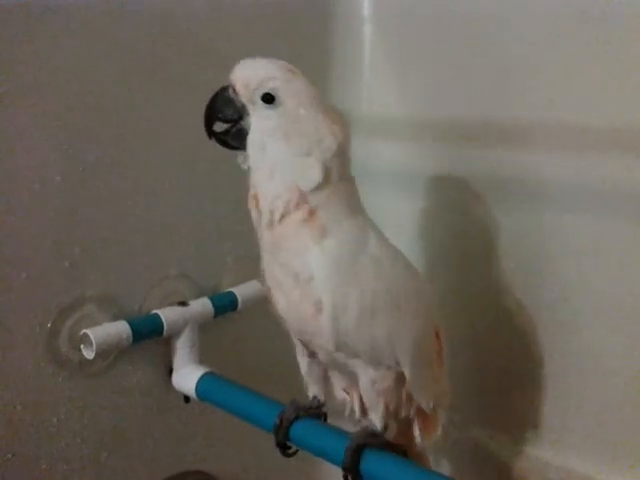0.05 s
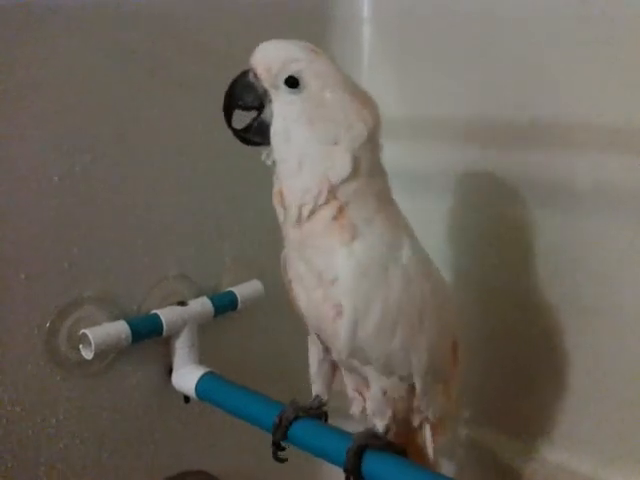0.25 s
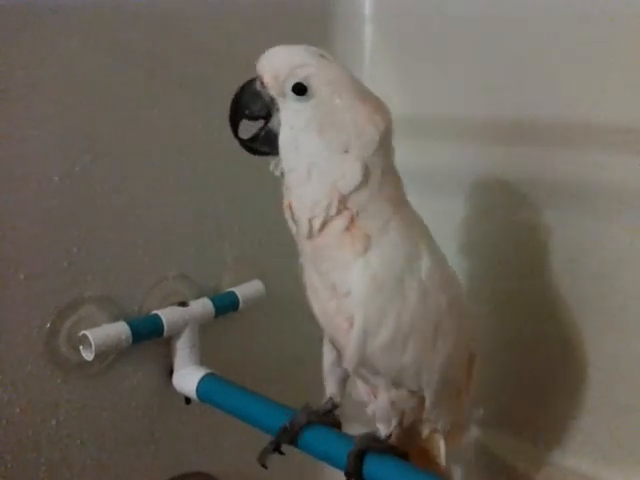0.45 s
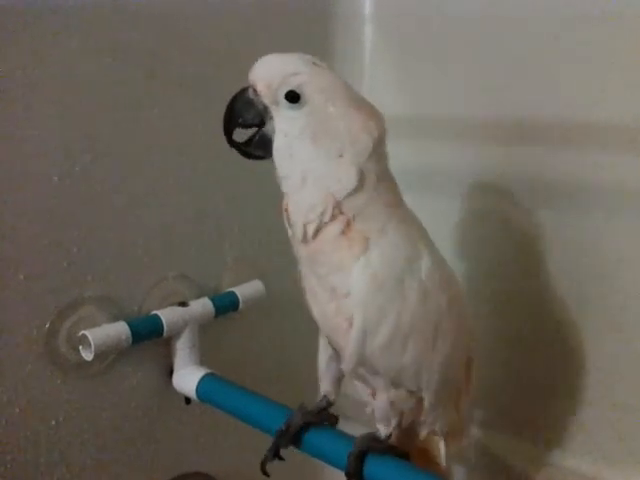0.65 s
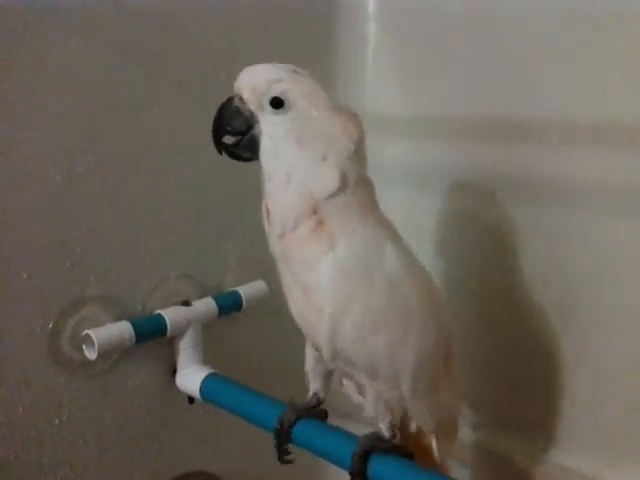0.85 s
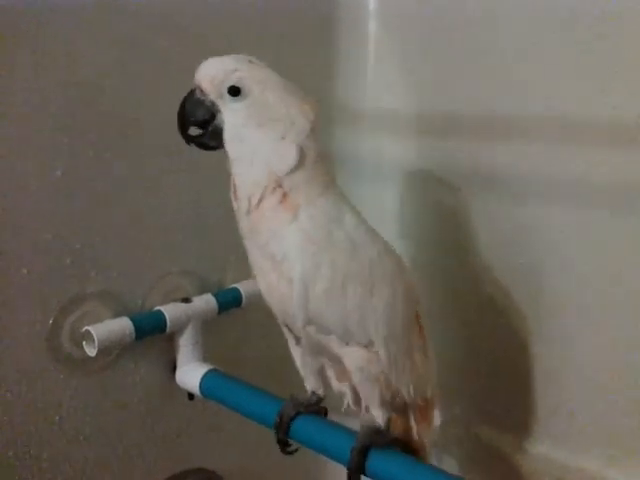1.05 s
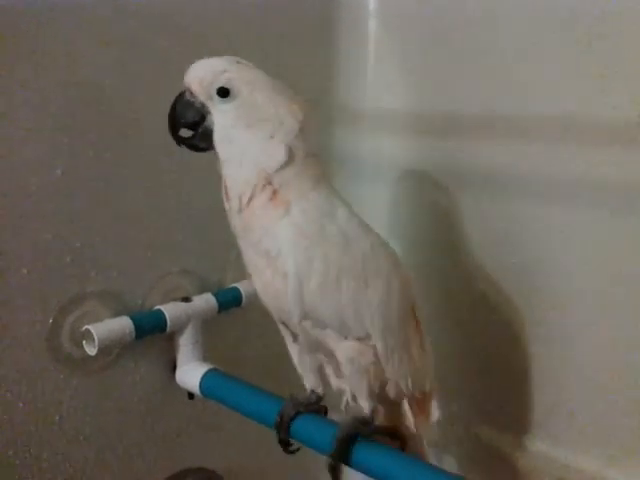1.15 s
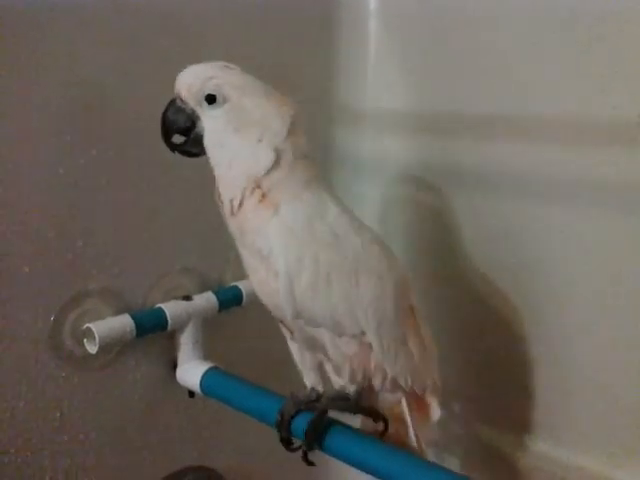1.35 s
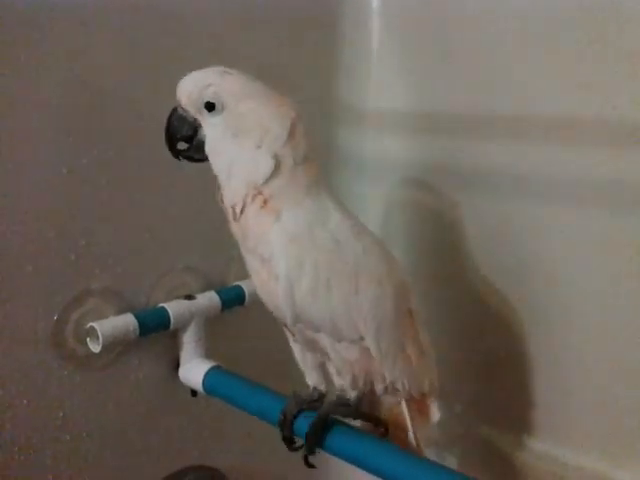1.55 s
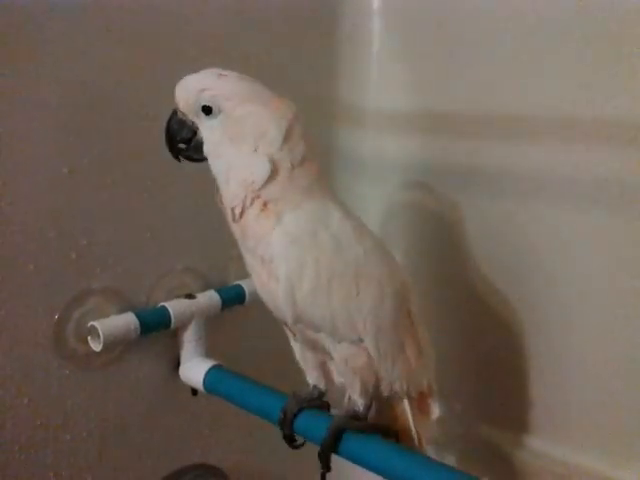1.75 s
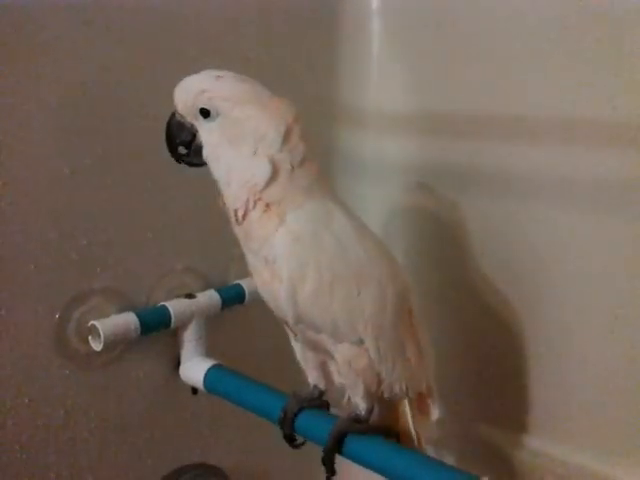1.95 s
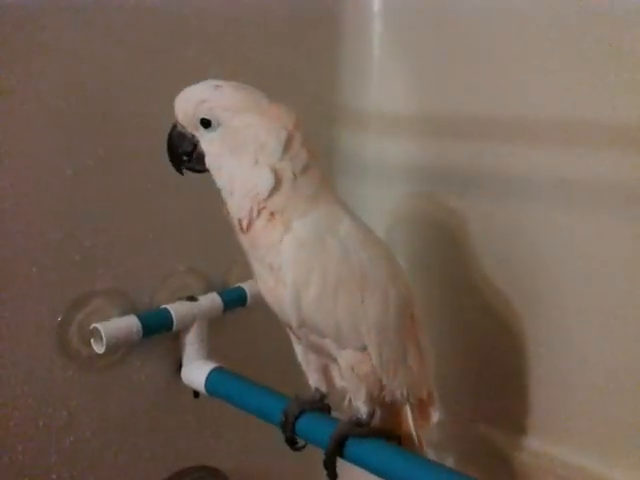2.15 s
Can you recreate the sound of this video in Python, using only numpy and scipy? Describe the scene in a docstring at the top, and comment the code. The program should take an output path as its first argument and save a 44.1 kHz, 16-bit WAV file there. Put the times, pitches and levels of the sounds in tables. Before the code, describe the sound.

A cockatoo squawks once, starting on a clear falling note that turns into a harsh, fluttering rasp and ends in a hissy croak. After a pause it clacks its beak rapidly. Small bathroom walls add a short echo.

```python
"""A cockatoo squawks once in a small, hard-walled bathroom, then clacks its beak in a quickening run.
Its voice box (the syrinx) first vibrates evenly, making a clear falling note. It then slaps unevenly,
so the throat rings with a harsh, fluttering rasp, and ends in a short, hissy croak. Each clack
makes the hollow beak ring. The walls echo voice and beak; under them are a faint rustle of
feathers, two dull bumps and a steady hush."""
import sys
import numpy as np
from scipy import signal
from scipy.fft import rfft, irfft
from scipy.io import wavfile
from scipy.ndimage import uniform_filter1d

SR = 44100
rng = np.random.default_rng(int(sys.argv[2]) if len(sys.argv) > 2 else 0)


def store_wav(level_fs):
    """Save 16-bit WAV to argv[1]."""
    pcm = np.round(np.clip(np.atleast_2d(level_fs), -1, 1) * 32767)
    wavfile.write(sys.argv[1], SR, pcm.T.astype(np.int16))


N = 97020
T = np.arange(N) / SR


def amp(db):
    """Turns decibels into a gain to multiply by."""
    return 10 ** (np.asarray(db) / 20)


def unit(x):
    """Scales a signal to an average (rms) strength of 1."""
    return x / np.sqrt(np.mean(x ** 2) + 1e-20)


def fade(t, ring_s, level_db=0):
    """Starts at level_db and falls 60 dB every ring_s seconds."""
    return amp(level_db - 60 * t / ring_s)


def value_at(points, hz):
    """Looks up a frequency between the rows of a table, on a log scale."""
    freq_hz, values = np.transpose(points)
    return np.interp(np.log(hz + 1), np.log(freq_hz), values)


def levels(rows):
    """One gain curve for each dB column, silent before the first row and after the last."""
    times, *columns = np.transpose(rows)
    return [amp(np.interp(T, times, db)) * (T >= times[0]) * (T <= times[-1]) for db in columns]


def pitch_and_levels(rows):
    """Turns rows of time, pitch and any dB columns into a pitch curve and gain curves."""
    times, pitch_hz = np.transpose(rows)[:2]
    return np.interp(T, times, pitch_hz), levels(np.delete(rows, 1, axis=1))


def add(mix, start_s, sound):
    """Mixes a sound in at its start time."""
    part = mix[max(round(start_s * SR), 0):][:len(sound)]
    part += sound[:len(part)]


def colour(x, points, size=4096):
    """Makes some frequencies louder and others softer; white noise keeps its overall strength."""
    log_gain = np.log(amp(value_at(points, abs(np.fft.fftfreq(size, 1 / SR)))))
    response = np.exp(np.conj(signal.hilbert(log_gain)))  # rings after a sound, never before
    taps = np.fft.ifft(response).real[:size // 2]
    return signal.fftconvolve(x, taps / np.linalg.norm(taps))[:len(x)]


def wobbly_phase(hz, jitter, rate_hz):
    """The running angle of a vibration whose pitch wanders at random by the fraction jitter."""
    keep_slow = np.exp(-(np.fft.rfftfreq(N, 1 / SR) / rate_hz) ** 2)
    wander = unit(irfft(rfft(rng.standard_normal(N)) * keep_slow, N))
    return 2 * np.pi * np.cumsum(hz * (1 + jitter * wander)) / SR


# The tone of the hush: freq_hz, gain_db
AIR_COLOUR = [(20, -34.5), (146, -10.5), (319, -6), (472, -10.5), (600, -10), (828, -13.5), (5730, -21.5),
              (8680, -27.5), (19100, -120)]

def room_air(level_db=-61.5):
    """A faint, steady hush fills the room."""
    return amp(level_db) * unit(colour(rng.standard_normal(N), AIR_COLOUR))


# How long the room rings, from low to high: freq_hz, ring_s
ROOM_RING = [(150, 0.67), (400, 0.4), (850, 0.28), (5000, 0.24), (8000, 0.14)]
# Bounces off the nearest walls: delay_s, gain
WALL_ECHOES = [(.0034, 0.12), (.0052, -0.16), (0.0163, .15)]

def bathroom(x, size=32768, standing_wave_hz=440.7):
    """Hard walls return a few quick echoes, a dense tail and one standing wave that rings on."""
    average_fade = fade(np.arange(size) / SR, np.mean(np.transpose(ROOM_RING)[1]))
    noise = rng.standard_normal(size)
    for _ in range(6):  # even out the noise across pitch, then across time
        even = irfft(np.exp(1j * np.angle(rfft(noise * average_fade))), size)
        noise = even / np.sqrt(abs(uniform_filter1d(even ** 2, size=300)) + 1e-20)
    hz, frame_s, bands = signal.stft(noise, SR, nperseg=256)
    bands = bands * fade(frame_s, value_at(ROOM_RING, hz)[:, None])
    tail = signal.istft(bands, SR, nperseg=256)[1]
    t = np.arange(len(tail)) / SR
    tail *= np.clip(t / .0042 - .5, 0, 1)  # the tail arrives a moment late
    tail /= np.linalg.norm(tail)
    tail += .0025 * fade(t, ring_s=1) * np.sin(2 * np.pi * standing_wave_hz * t)
    for delay_s, gain in WALL_ECHOES:
        add(tail, delay_s, np.array([gain]))
    return signal.fftconvolve(x, tail)[:N]


# Faint, dull thuds: start_s, pitch_hz, level_db
SOFT_BUMPS = [(0.126, 235.7, -62), (.95, 135.5, -63.5)]

def bumps(rise_s=.007, ring_s=.6):
    """Soft low thuds, perhaps the perch as the bird shifts its feet."""
    out, t = np.zeros(N), T[:SR // 2]
    rise = np.minimum(t / rise_s, 1)
    for start_s, hz, db in SOFT_BUMPS:
        add(out, start_s, rise * fade(t, ring_s, db) * np.sin(2 * np.pi * hz * t))
    return out


# The thin tone of rustling feathers, also used for the beak's scrape: freq_hz, gain_db
SCRAPE_COLOUR = [(1000, -19.5), (2800, -3), (4200, -9.5), (5800, -0.5), (9000, -17.5)]

def feathers(peak_s=1.35, width_s=.035, level_db=-61.5):
    """The feathers stir in one soft, brief rustle."""
    swell = np.exp(-((T - peak_s) / width_s) ** 2)
    return amp(level_db) * swell * colour(rng.standard_normal(N), SCRAPE_COLOUR)


# How loud the beak grinds around the hardest clacks: time_s, level_db
GRIND_LEVELS = [(1.885, -44.5), (1.895, -49.5), (1.955, -42.5), (2.0, -57.5)]
# The tone of the grinding: freq_hz, gain_db
SLIP_COLOUR = [(120, -33.5), (280, -1.5), (2500, 2.5), (3300, -16), (7200, -7.5), (9000, -29)]

def beak_grinding(slips_per_s=1100, spread_db=5.5):
    """The two halves of the beak rub together in many tiny slips."""
    slips = (rng.random(N) < slips_per_s / SR) * rng.choice([-1., 1.], N)
    slips *= amp(spread_db * rng.standard_normal(N))
    return levels(GRIND_LEVELS)[0] * unit(colour(slips, SLIP_COLOUR))


# Clacks, mostly in pairs as the tip hits and bounces: start_s, level_db, treble_db, knock_db
BEAK_CLACKS = [(0.012, -44, 16.5, 0.5), (1.6674, -34.5, 4, 1.5), (1.721, -35.5, 4.5, 2.5),
               (1.768, -27.5, 0.5, -3), (1.7811, -35, -8, -0.5), (1.807, -24.5, -1, -4.5),
               (1.822, -35, -1, 1), (1.8551, -23, 1.5, -3.5), (1.8675, -32, -1, 2),
               (1.8891, -18.5, 1.5, -4), (1.902, -18, -3.5, -4), (1.933, -16.5, -2, -6),
               (1.9457, -20.5, -1.5, -2.5), (2.019, -25, 6.5, 5), (2.032, -34, -11, 8),
               (2.069, -31.5, -5, -3), (2.16, -30.5, 4.5, -0.5), (2.1737, -31.5, 1, -8)]
# The notes of the hollow beak, its hard tip and the low knock: pitch_hz, level_db, ring_s
HOLLOW_NOTES = [(754, -12, 0.016), (1208, 3, 0.0064), (1462, -1.5, 0.0071), (2190, -14, 0.018),
                (2690, -10, 0.0073)]
TIP_NOTES = [(4500, 1, 0.0056), (7140, -19, .005)]
KNOCK_NOTES = [(285, -18, 0.03), (351.4, -29, 0.21), (422.3, -19, 0.096), (593, -9, 0.023)]
# The tone of the tip's snap: freq_hz, gain_db
TIP_SNAP_COLOUR = [(300, -3.5), (1500, 1), (3300, -8), (4200, -1.5), (6000, -12), (9000, -26.5)]

def beak_clacks(size=5000, contact_s=.0013, knock_rise_s=.003):
    """In each clack the tip snaps, the hollow beak rings and a low knock swells just after."""
    out, t = np.zeros(N), np.arange(size) / SR
    contact = np.minimum(t / contact_s, 1)
    knock_rise = np.minimum(t / knock_rise_s, 1)

    def ring(notes, random_phase=False):
        """Struck notes die away, tuned a little differently each time."""
        sound = np.zeros(size)
        for hz, db, ring_s in notes:
            pitch_hz = hz * (1 + .015 * rng.standard_normal())
            turns = pitch_hz * t + random_phase * rng.random()
            sound += fade(t, ring_s, db) * np.sin(2 * np.pi * turns)
        return sound

    def burst(points, level_db, ring_s):
        """A click made of quickly fading noise."""
        return colour(rng.choice([-1., 1.], size) * fade(t, ring_s, level_db), points)

    for start_s, db, treble_db, knock_db in BEAK_CLACKS:
        shell = ring(HOLLOW_NOTES) + amp(treble_db) * ring(TIP_NOTES)
        knock = amp(knock_db) * knock_rise * ring(KNOCK_NOTES, random_phase=True)
        snap_db = -7 + treble_db + .37 * (db + 26)  # harder clacks have a bigger share of snap
        snap = burst(TIP_SNAP_COLOUR, snap_db, ring_s=.012)
        add(out, start_s, amp(db) * (contact * (shell + snap) + knock))
    edge_scrape = burst(SCRAPE_COLOUR, level_db=-44.5, ring_s=.017)
    add(out, start_s=.1075, sound=edge_scrape)
    return signal.sosfilt(signal.butter(5, 210, "high", fs=SR, output="sos"), out)


def voice_pulses(hz, jitter, breath):
    """The voice box slaps unevenly, with a puff of air each time; breath (0 to 1) favours the puffs."""
    turns = wobbly_phase(hz, jitter, rate_hz=300) / (2 * np.pi)
    slaps = np.diff(np.floor(turns), prepend=0)
    puffs = (.4 + np.exp(-(turns % 1) / 1.3)) * rng.standard_normal(N)
    return unit((1 - breath) * unit(slaps - slaps.mean()) + breath * unit(puffs))


# The croak's note and its first two harmonics: time_s, pitch_hz, first_db, second_db
CROAK_NOTE = [(.744, 400, -64, -58), (.752, 407, -46, -34), (.772, 428, -51, -30.5),
              (.798, 422, -49, -33.5), (.815, 405, -43, -48), (.835, 400, -45, -54), (.848, 297, -49, -62),
              (.893, 296, -52, -72), (.91, 432, -53, -68), (.945, 432, -54, -74), (.99, 432, -70, -91)]
# How hoarse the croak is: time_s, throat_db, hiss_db
HOARSE_LEVELS = [(.741, -71, -67), (.7455, -31.5, -54), (.758, -34, -54), (.762, -32, -41),
                 (.79, -34, -42.5), (.812, -41, -44), (.85, -41, -45), (.875, -45.5, -53),
                 (.92, -52.5, -61)]
# The tone of the hoarse throat and of the hiss: freq_hz, gain_db
CROAK_THROAT = [(200, -31.5), (350, -11), (700, 5), (1000, 3.5), (1250, 0.5), (1600, 9), (1950, 6),
                (2300, -4), (3500, -47.5)]
CROAK_HISS = [(1500, -38.5), (2500, 0.5), (3000, 7), (3600, -2), (4200, 0.5), (5000, -7), (5450, -26),
              (6400, -11.5), (7100, -57.5)]

def croak():
    """A lower note, hoarse at first, dips under a hiss and ends in a soft hoot."""
    pitch_hz, gains = pitch_and_levels(CROAK_NOTE)
    phase = wobbly_phase(pitch_hz, jitter=.012, rate_hz=91)
    tone = np.sqrt(2) * sum(gain * np.sin(k * phase) for k, gain in enumerate(gains, 1))
    pulses = voice_pulses(pitch_hz, jitter=.11, breath=.64)
    throat_gain, hiss_gain = levels(HOARSE_LEVELS)
    return tone + throat_gain * colour(pulses, CROAK_THROAT) + hiss_gain * colour(pulses, CROAK_HISS)


def steady_pressure(x, smooth_s=.005):
    """Steady air pressure holds a rough vibration at an even strength."""
    window = signal.windows.hann(2 * round(smooth_s * SR))
    power = signal.fftconvolve(x ** 2, window / window.sum(), "same")
    return x / np.sqrt(abs(power) + 1e-12)


# How loud the throat's low and high rings are: time_s, low_db, high_db
RASP_LEVELS = [(.39, -72, -75.5), (.405, -31, -34), (.44, -38.5, -36), (.5, -30, -31), (.535, -42, -27.5),
               (.555, -30, -29.5), (.62, -25.5, -22.5), (.662, -34.5, -25), (.682, -37.5, -31),
               (.697, -57, -30.5), (.735, -62, -55)]
# The tone of each ring: freq_hz, gain_db
LOW_RING = [(60, -69), (250, -63.5), (500, -21.5), (640, -4.5), (800, 1.5), (930, -0.5), (1080, -17.5),
            (1400, -28.5), (2400, -71.5)]
HIGH_RING = [(60, -67), (330, -11), (560, -10.5), (800, -22.5), (1200, -6.5), (1640, 3.5), (1820, -4),
             (2250, -31.5), (3050, -37), (3900, -48), (4750, -35.5), (5400, -45.5), (6250, -30.5),
             (7200, -71.5)]
# A strained tone that wavers inside the rasp: time_s, pitch_hz, level_db
STRAINED_TONE = [(.41, 1620, -50), (.455, 1590, -32), (.53, 1630, -33), (.553, 1640, -25.5),
                 (.6, 1630, -25), (.625, 1520, -28), (.665, 1590, -25), (.7, 1590, -50)]

def rasp(pulse_hz=545.8, flutter_hz=80, flutter_start_s=.36, flutter_full_s=.7):
    """Rough pulses ring the throat around a strained tone; brief chokes of the voice make it flutter."""
    depth = .85 * np.clip((T - flutter_start_s) / (flutter_full_s - flutter_start_s), 0, 1)
    chokes = (.5 + .5 * np.sin(wobbly_phase(flutter_hz, jitter=.22, rate_hz=47))) ** 2
    pulses = voice_pulses(pulse_hz, jitter=.11, breath=.42)
    low_gain, high_gain = levels(RASP_LEVELS)
    low = low_gain * steady_pressure(colour(pulses, LOW_RING))
    high = high_gain * steady_pressure(colour(pulses, HIGH_RING))
    tone_hz, (tone_gain,) = pitch_and_levels(STRAINED_TONE)
    tone = np.sqrt(2) * tone_gain * np.sin(wobbly_phase(tone_hz, jitter=.026, rate_hz=200))
    return (1 - depth * chokes) * (low + high + tone)


# The falling note that opens the squawk: time_s, pitch_hz
FALLING_PITCH = [(.2, 1120), (.207, 947), (.215, 788), (.228, 741), (.246, 640), (.285, 654.5),
                 (.312, 639.8), (.335, 650.6), (.372, 666.4), (.41, 647.4)]
# Its harmonics, at 1, 2 and 3 times the pitch: time_s, first_db, second_db, third_db
HARMONIC_LEVELS = [(.2, -53, -84.5, -86.5), (.209, -32, -61, -70.5), (.227, -39, -37.5, -55.5),
                   (.243, -53, -33, -49.5), (.262, -38.5, -37.5, -62), (.288, -45.5, -31.5, -44.5),
                   (.335, -40, -34, -46), (.36, -54.5, -33, -54), (.395, -41.5, -34, -45),
                   (.45, -56, -68.5, -55)]
# Fainter harmonics that follow the third: pitch_multiple, relative_db
UPPER_HARMONICS = [(4, -24.5), (7, -29), (9, -27)]
# How loud the voice cracks as it falls: time_s, level_db
CRACK_LEVELS = [(.2, -69.5), (.21, -38.5), (.235, -40.5), (.257, -31), (.272, -37), (.3, -73)]
# The tone of the crack: freq_hz, gain_db
CRACK_TONE = [(300, -44), (620, -25), (780, 5.5), (1450, -9), (3200, -40), (5900, -33.5), (7500, -66.5)]

def clear_note():
    """The voice box vibrates evenly: a nearly pure note drops, cracks briefly and holds."""
    pitch_hz = np.interp(T, *np.transpose(FALLING_PITCH))
    phase = wobbly_phase(pitch_hz, jitter=.005, rate_hz=260)
    gains = levels(HARMONIC_LEVELS)
    tone = sum(gain * np.sin(k * phase) for k, gain in enumerate(gains, 1))
    upper = gains[-1] * sum(amp(db) * np.sin(round(k) * phase) for k, db in UPPER_HARMONICS)
    crack = levels(CRACK_LEVELS)[0] * colour(rng.standard_normal(N), CRACK_TONE)
    return np.sqrt(2) * (tone + upper) + crack


def scene():
    """The bird, heard directly and thrown back by the walls, over the quiet background."""
    # sound, echo_db
    bird = [(clear_note(), -13), (rasp(), -10), (croak(), -14), (beak_clacks() + beak_grinding(), -5.5)]
    direct = sum(sound for sound, _ in bird)
    echoes = bathroom(sum(amp(echo_db) * sound for sound, echo_db in bird))
    return (direct + echoes + feathers() + bumps() + room_air())[None]


def record(dry, soften_hz=6710, cutoff_hz=8834):
    """Softens the treble, then cuts off the very highest sounds."""
    softened = signal.sosfilt(signal.butter(8, soften_hz, fs=SR, output="sos"), dry)
    cutoff = signal.firwin(511, cutoff_hz, window=("kaiser", 9), fs=SR)
    return signal.oaconvolve(softened, cutoff[None], "same")


dry = scene()
out = record(dry)
store_wav(out)
```